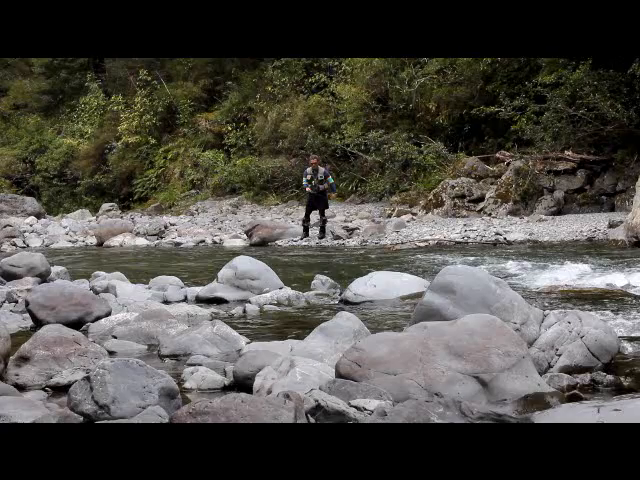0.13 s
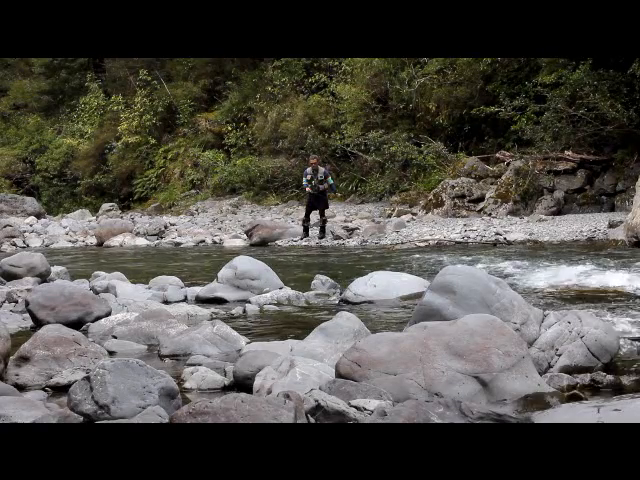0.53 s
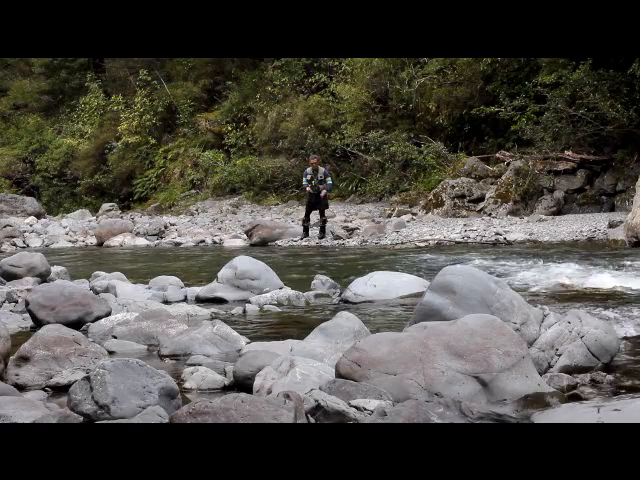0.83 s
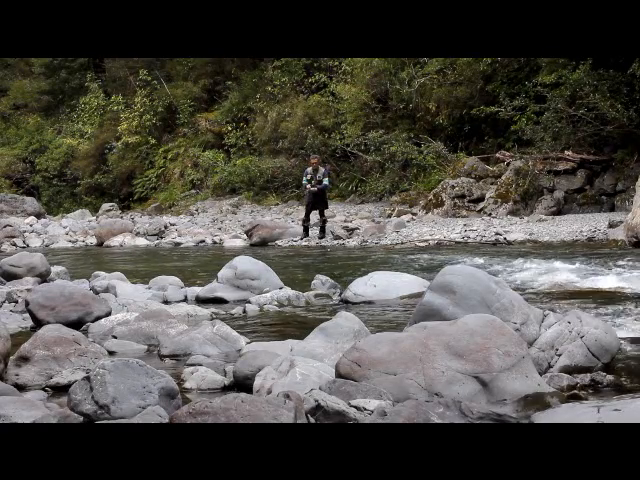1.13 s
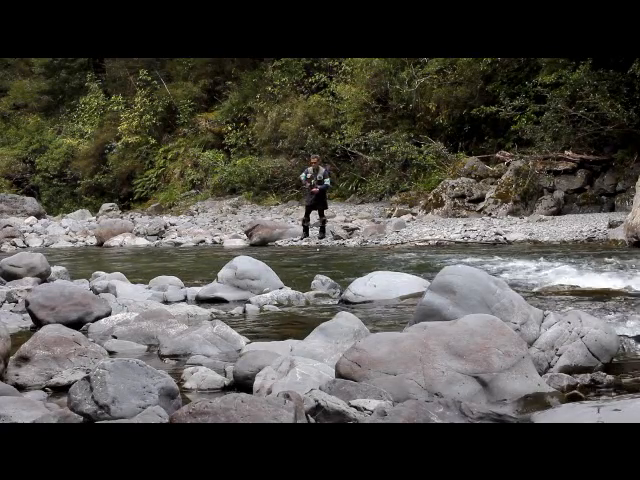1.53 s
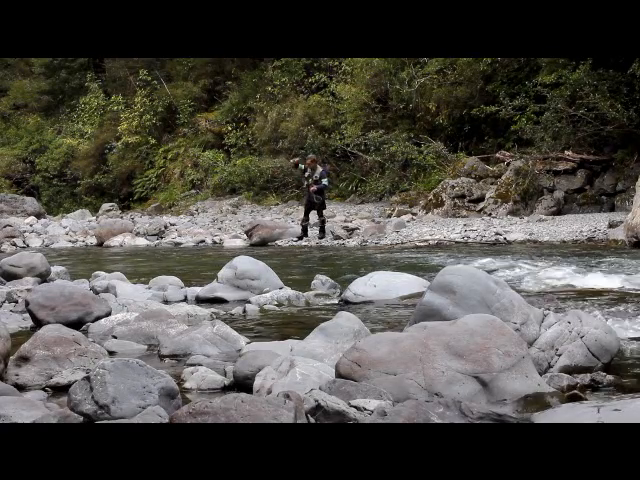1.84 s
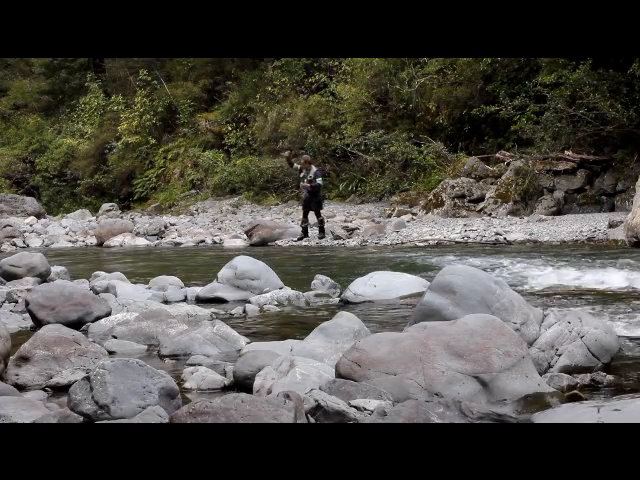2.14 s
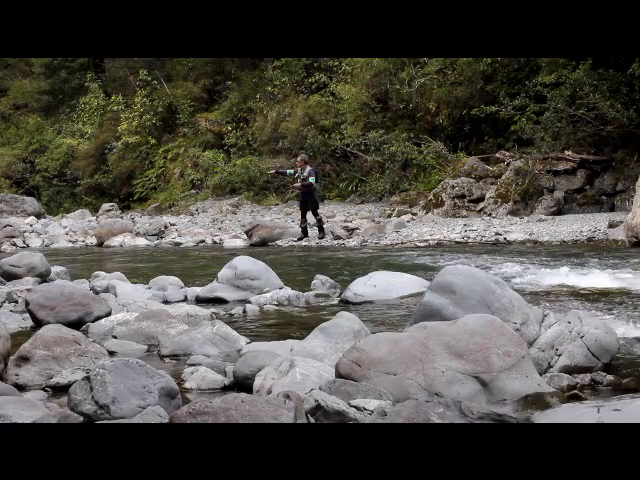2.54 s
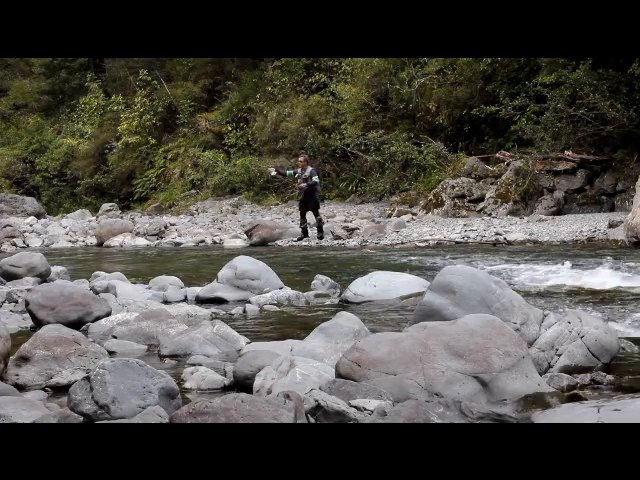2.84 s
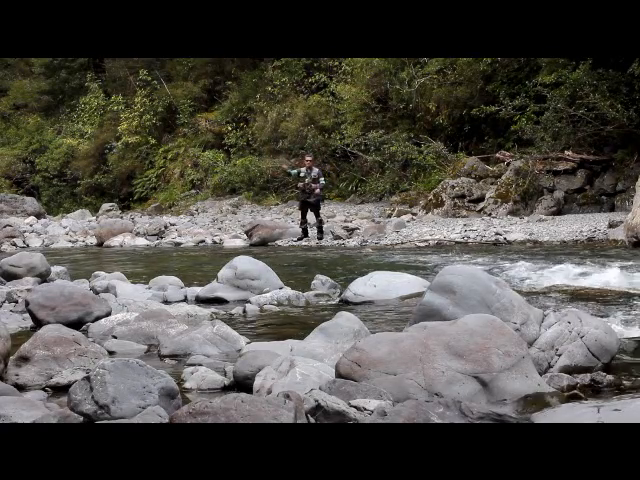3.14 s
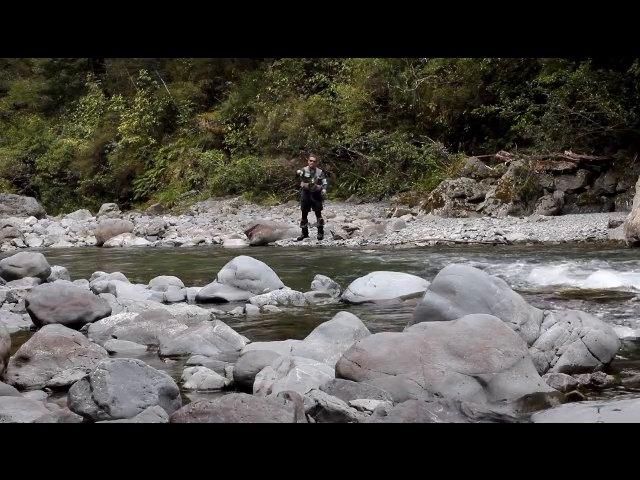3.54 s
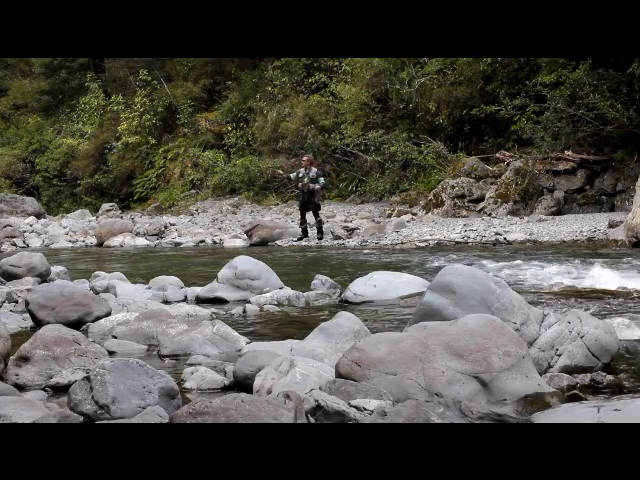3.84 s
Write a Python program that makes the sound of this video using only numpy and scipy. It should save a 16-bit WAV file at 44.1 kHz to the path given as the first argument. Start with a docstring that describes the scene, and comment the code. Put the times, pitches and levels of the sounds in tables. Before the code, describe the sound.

Continuous river rush, full and bubbly, rises in one long smooth fade-in. Occasional watery gulps and tiny droplet ticks surface, a far bird peeps faintly; open rocky bank, steady mono microphone near the water.

```python
"""Rocky river with a far bird

A river roars under a long fade-in: dense ringing bubbles and filtered noise share one spectrum,
and its half-octave bands swell and flicker. Gulps are brief tones of rising pitch, droplet ticks
very short pings, and faint bird whistles gliding sines. Both channels carry the same signal."""
import sys
import numpy as np
from scipy import signal
from scipy.fft import rfft, irfft
from scipy.io import wavfile

SR = 44100
rng = np.random.default_rng(int(sys.argv[2]) if len(sys.argv) > 2 else 0)


def unload_wav(signal):
    """Save mono or channel-first audio to the path in sys.argv[1] as 16-bit WAV at rate SR, clipped to [-1, 1]."""
    wavfile.write(
        sys.argv[1],
        SR,
        np.round(np.clip(np.atleast_2d(signal).T, -1, 1) * 32767).astype(np.int16),
    )


def volts_from_decibels(level):
    """Turn decibel levels (scalar or array-like) into linear amplitude factors."""
    exponent = np.asarray(level, float) / 20
    return 10 ** exponent


N = 176400

# All levels of the sources are those before the fade.
# swells of the water: (t/s, churn/dB: half is added to the lows and half taken from the highs,
# spray/dB: added to the highs)
SWELLS = [(0.15, -0.3, 1.2), (0.22, 1.5, 0.5), (0.31, -1.1, 0.8), (0.4, -0.8, -1.0), (0.51, -1.1, 1.4),
          (0.75, 1.2, -0.2), (0.99, 0.2, 1.1), (1.33, -0.7, 0.5), (1.38, -0.1, -0.6), (1.47, 0.1, 0.7),
          (1.69, 2.1, -0.2), (1.74, 1.3, -1.9), (1.87, -0.8, -1.0), (2.11, 0.9, 0.5), (2.29, -0.5, 0.7),
          (2.35, -0.0, -0.6), (2.8, -0.1, 0.2), (2.86, -0.6, -1.0), (2.93, -0.7, 0.6), (2.99, -1.2, -1.0),
          (3.22, -0.6, 1.4), (3.34, 0.0, -1.4), (3.59, -0.2, 0.1), (3.69, 0.4, -1.1), (3.78, -0.8, 0.7),
          (3.85, -0.3, -1.0), (3.92, 0.2, 0.7), (4.0, -0.2, -1.1)]
# spectral density of the river: (f/Hz, relative level per Hz/dB)
RIVER_SPECTRUM = [(18, -71), (30, -42.5), (146, -11), (228, -6.5), (259, -3.5), (424, 0), (509, -4.5),
                  (643, -2), (714, -9.5), (813, -6.5), (975, -8.5), (1680, -11), (3480, -20.5), (3960, -21),
                  (7020, -28.5), (13400, -32), (14900, -35)]
# share of the power due to bubbles, the rest being smooth rush: (f/Hz, share from 0 to 1)
BUBBLE_POWER_SHARE = [(100, 0.17), (400, 0.37), (1500, 0.24), (5000, .2), (12000, 0.19)]
# large air pockets closing: (t/s, starting f/Hz, peak level/dB)
AIR_POCKETS = [(.22, 185, -29), (.71, 280, -22), (.755, 307, -22), (.885, 403, -24), (.98, 216, -25),
               (.98, 1100, -29), (1.32, 1880, -22.5), (1.4, 173, -28.5), (1.57, 430, -24),
               (1.68, 414, -18.5), (1.733, 830, -22), (1.819, 314, -24), (2.112, 268, -22.5),
               (2.205, 645, -21.5), (2.805, 278, -28), (2.895, 1720, -27), (3.31, 398, -23.5),
               (3.345, 450, -22.5), (3.381, 2100, -31), (3.385, 470, -25), (3.388, 1070, -21),
               (3.395, 830, -20)]
# droplets on stone: (t/s, f/Hz, peak level/dB)
DROPLETS = [(.499, 7200, -32), (.72, 5500, -34), (.99, 6900, -37), (2.572, 5000, -29.5), (2.572, 7400, -37),
            (3.413, 5100, -32)]
# far bird notes: (t/s, length/s, f in mid-note/Hz, total glide/Hz, level 3 dB below the peak/dB)
BIRD_NOTES = [(.9, .06, 4290, 30, -53), (1.0, .06, 4340, 20, -51), (1.07, .05, 4370, 0, -49),
              (1.21, .05, 4338, -10, -50), (2.365, .055, 4105, -30, -47.5), (2.49, .105, 4072, 40, -46.5),
              (2.63, .07, 4110, 70, -50), (2.74, .04, 4145, 0, -50), (2.94, .04, 3690, 0, -50),
              (3.035, .04, 3860, 60, -49), (3.14, .07, 3808, 10, -47.5), (3.32, .05, 3822, 0, -47.5),
              (3.455, .055, 3811, 0, -47), (3.62, .04, 3845, 0, -51), (3.675, .06, 3854, 20, -48),
              (3.885, .05, 3800, 0, -49)]

RIVER_RMS_DB = -26.5
SPRAY_FROM_HZ, BLEND_OCTAVES = 1800, 0.85   # spray has half weight here; smoothness of the crossover
BUBBLES_PER_S = 8000
BUBBLE_CYCLES = 6.4          # cycles in which a ring falls by 20 dB
BUBBLE_EXCESS_DB = 2.5       # scale of the exponential spread of bubble levels
GULP_CYCLES = 5.4            # the peak comes after a quarter of this
GULP_RISE = 0.026            # share of the starting pitch gained per cycle
TICK_S = 0.0029              # the peak comes after a quarter of this
LOWEST_BAND_HZ, BANDS = 44, 18
DRIFT_STEP = 40              # samples between points of slow chance
FADE_START_S, FADE_EASE_S, FADE_CURVE = 0.062, 0.036, 1.012


def rms_one(x):
    """Normalisation: divides a signal by its root mean square."""
    return x / np.sqrt(np.mean(x ** 2) + 1e-20)


def at_hz(points, hz):
    """Interpolation of a table along logarithmic frequency."""
    hz_points, values = np.transpose(points)
    return np.interp(np.log(hz + 1), np.log(hz_points), values)


def drift(rate_hz, count):
    """Low-pass filtering: two equal poles slow white noise into rows of chance with rms 1."""
    r = np.exp(-2 * np.pi * rate_hz * DRIFT_STEP / SR)
    settling = 2000   # points discarded while the filter settles
    noise = rng.standard_normal((count, N // DRIFT_STEP + settling + 2))
    slow = signal.lfilter([1], [1, -2 * r, r * r], noise)[:, settling:]
    points = np.arange(N) / DRIFT_STEP
    return [np.interp(points, np.arange(len(row)), rms_one(row)) for row in slow]


def bubbles():
    """Damped resonance: random impulses ring a few cycles each, with about even power per Hz."""
    level_db = BUBBLE_EXCESS_DB * np.minimum(rng.exponential(1, N), 5)
    sizes = volts_from_decibels(level_db) * rng.choice([-1, 1], N)
    born = rng.random(N) < BUBBLES_PER_S / SR
    pitches = np.geomspace(90, 15000, 56)
    odds = np.cumsum(pitches ** 0.5)   # small, high bubbles are commoner
    dealt = np.searchsorted(odds, rng.random(N) * odds[-1])
    out = 0
    for k, hz in enumerate(pitches):
        r = volts_from_decibels(-20 * hz / (BUBBLE_CYCLES * SR))
        w = 2 * np.pi * hz / SR
        impulses = sizes * born * (dealt == k) + 1e-18
        ring = signal.lfilter([1, 0, -1], [1, -2 * r * np.cos(w), r * r], impulses)
        out = out + rms_one(ring) * np.sqrt(hz)
    return rms_one(out)


def river(shared_db, near_db, own_db):
    """Superposition: bubbles and noise share a spectrum whose bands are modulated; rms 1."""
    hz = np.arange(N // 2 + 1) * SR / N
    share = np.clip(at_hz(BUBBLE_POWER_SHARE, hz), 0, 1)
    bubbling = np.sqrt(share) * rfft(bubbles())
    rush = np.sqrt(1 - share) * rfft(rng.standard_normal(N))
    water = (bubbling + rush) * volts_from_decibels(at_hz(RIVER_SPECTRUM, hz))

    t, churn_points, spray_points = np.transpose(SWELLS)
    time = np.arange(N) / SR
    churn_db = np.interp(time, t, churn_points)
    spray_db = np.interp(time, t, spray_points)

    # flicker common to the highs, shared by neighbouring bands, and each band's own
    shared = drift(11.0, count=1)[0]
    near = drift(4.9, count=BANDS + 2)
    own = drift(19.0, count=BANDS)

    place = np.clip(2 * np.log2((hz + 1) / LOWEST_BAND_HZ), 0, BANDS - 1)
    out = 0
    for k in range(BANDS):
        band = irfft(water * np.clip(1 - abs(place - k), 0, 1), N)
        centre_hz = LOWEST_BAND_HZ * 2 ** (k / 2)
        high = 1 / (1 + (SPRAY_FROM_HZ / centre_hz) ** (2 / BLEND_OCTAVES))
        swell_db = (0.5 - high) * churn_db + high * spray_db
        neighbours = sum(near[k:k + 3]) / 3 ** 0.5
        flicker_db = high * shared_db * shared + near_db * neighbours + own_db * own[k]
        out = out + band * volts_from_decibels(swell_db + flicker_db)
    return rms_one(out)


def gulps():
    """Resonance of a shrinking air pocket: a brief ring rises in pitch."""
    out = np.zeros(N)
    for t, hz, db in AIR_POCKETS:
        cycles = np.arange(int(2 * GULP_CYCLES / hz * SR)) * hz / SR
        x = 4 * cycles / GULP_CYCLES
        shape = x * np.exp(1 - x)
        turns = cycles * (1 + GULP_RISE * cycles / 2)
        i = int(t * SR)
        out[i:i + len(cycles)] += volts_from_decibels(db) * shape * np.sin(2 * np.pi * turns)
    return out


def ticks():
    """Impact of a droplet: a high sine under a very short rise and decay."""
    out = np.zeros(N)
    time = np.arange(int(3 * TICK_S * SR)) / SR
    x = 4 * time / TICK_S
    shape = x * np.exp(1 - x)
    for t, hz, db in DROPLETS:
        i = int(t * SR)
        out[i:i + len(time)] += volts_from_decibels(db) * shape * np.sin(2 * np.pi * hz * time)
    return out


def bird():
    """Frequency modulation: soft-edged pure notes glide linearly about their mid-note pitch."""
    out = np.zeros(N)
    for t, length, hz, glide_hz, db in BIRD_NOTES:
        time = np.arange(int(length * SR)) / SR
        turns = hz * time + glide_hz * (time / length - 1) * time / 2
        shape = np.sqrt(2 * np.sin(np.pi * time / length))
        i = int(t * SR)
        out[i:i + len(time)] += volts_from_decibels(db) * shape * np.sin(2 * np.pi * turns)
    return out


def scene():
    """Linear superposition: all sources add into one signal, given to both channels."""
    water = volts_from_decibels(RIVER_RMS_DB) * river(shared_db=0.28, near_db=0.5, own_db=0.5)
    mono = water + gulps() + ticks() + bird()
    return np.array([mono, mono])


def low_pass(x):
    """Removes everything above the highest recorded frequency."""
    return signal.sosfilt(signal.butter(12, 15000, fs=SR, output="sos"), x)


def record(dry):
    """Amplitude scaling: after a short silence a nearly linear fade, eased at its foot, lasts to the end."""
    s = np.clip(np.arange(N) / SR - FADE_START_S, 0, None)
    fader = (s / s[-1]) ** FADE_CURVE * (1 - np.exp(-s / FADE_EASE_S))
    return low_pass(dry * fader)


dry = scene()
out = record(dry)
unload_wav(out)
```